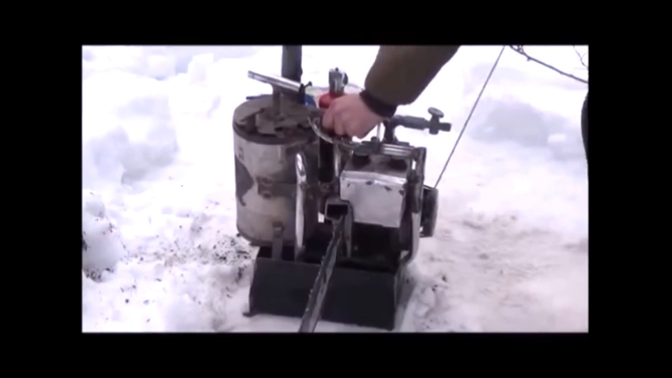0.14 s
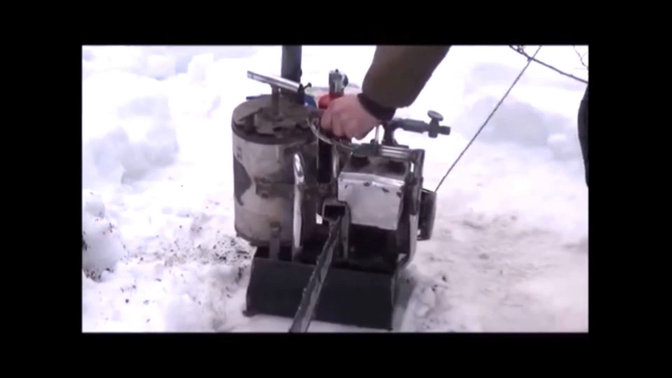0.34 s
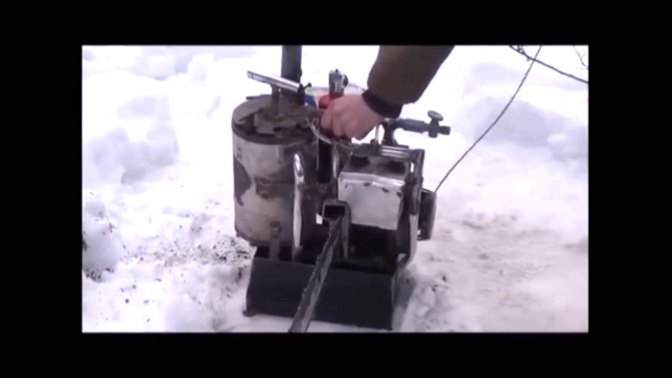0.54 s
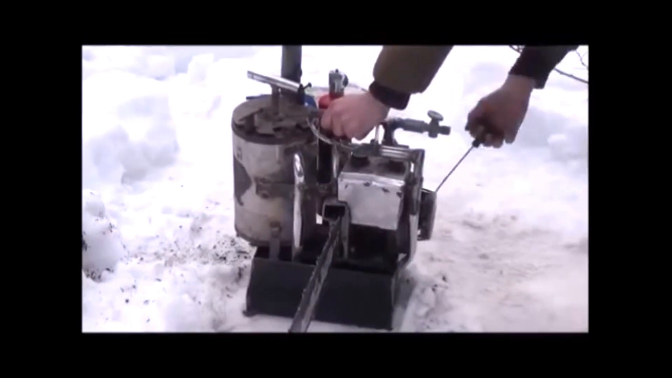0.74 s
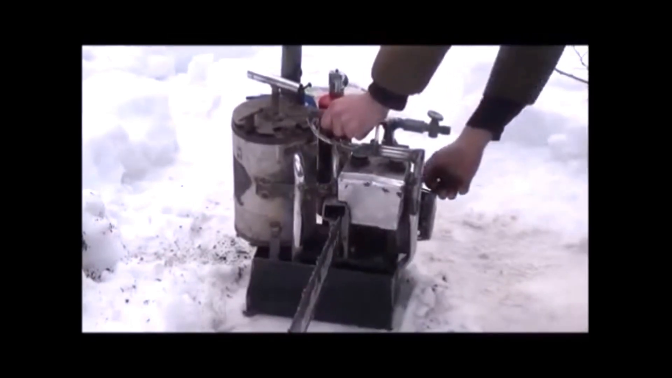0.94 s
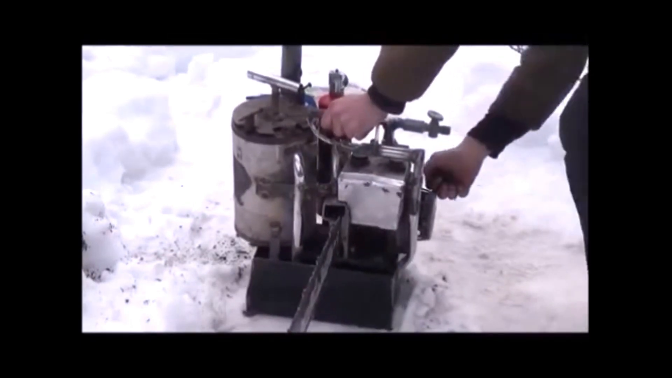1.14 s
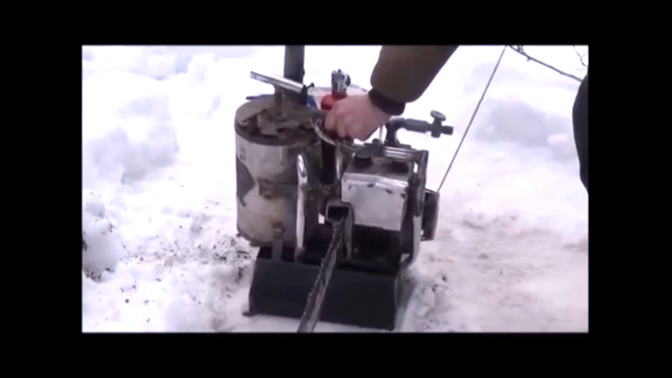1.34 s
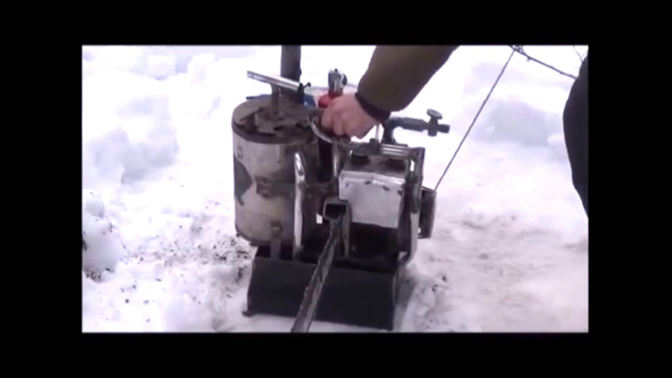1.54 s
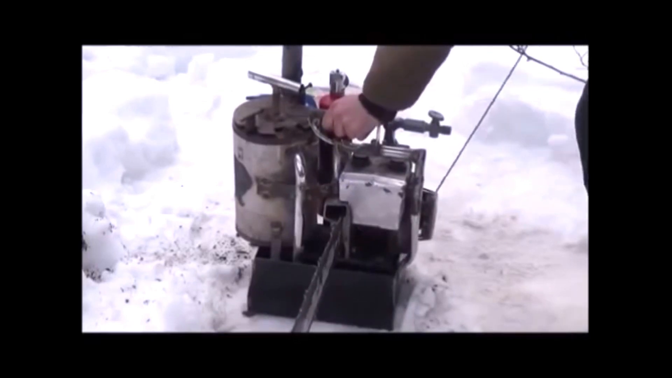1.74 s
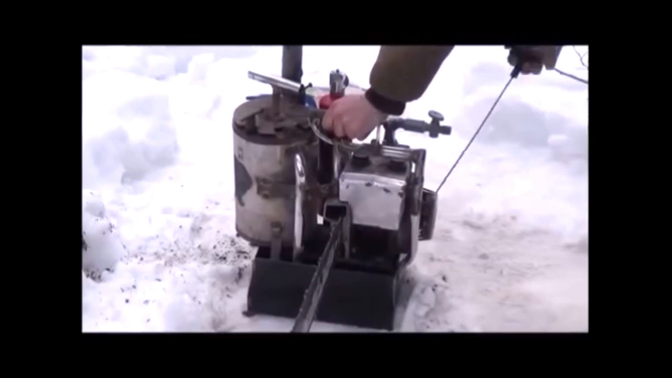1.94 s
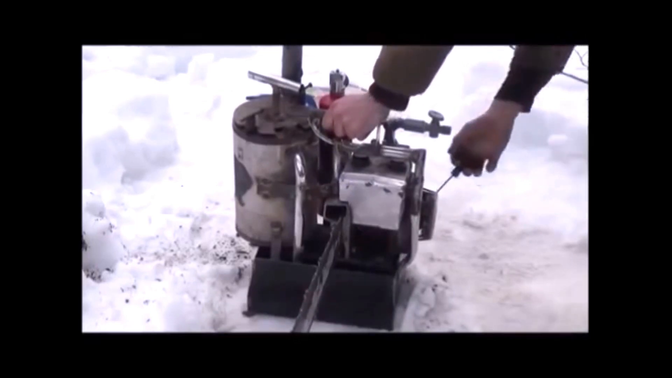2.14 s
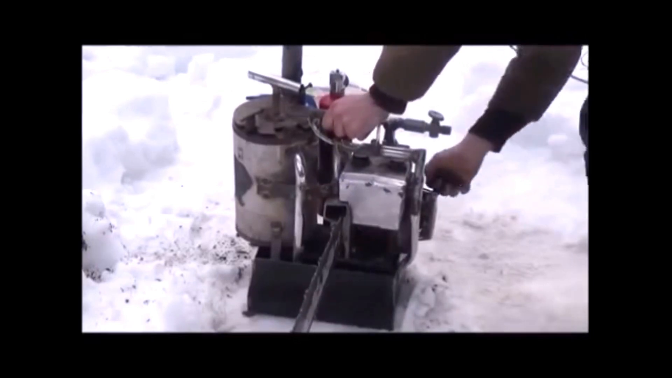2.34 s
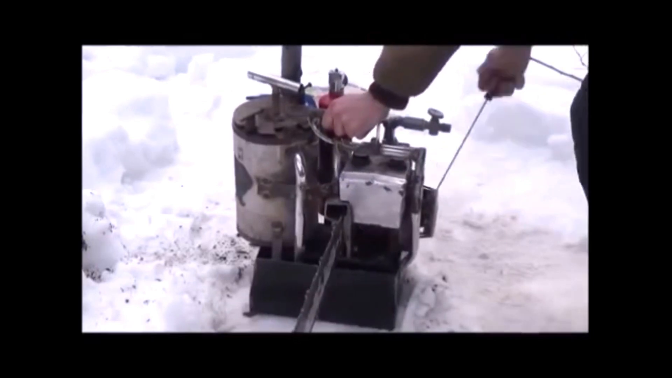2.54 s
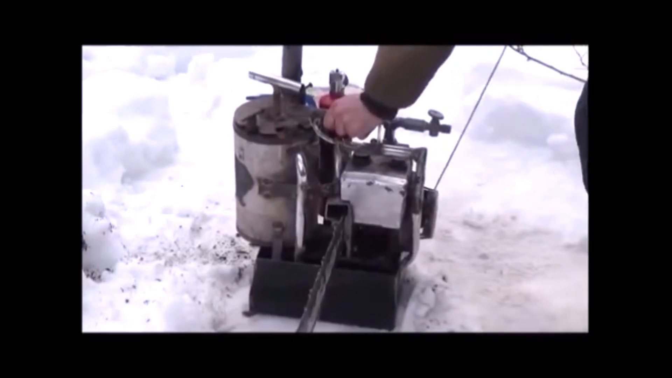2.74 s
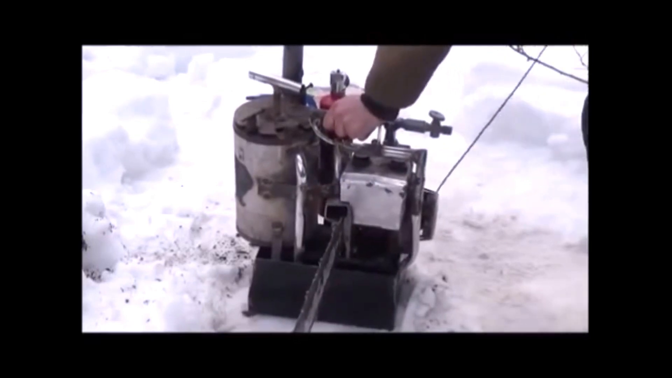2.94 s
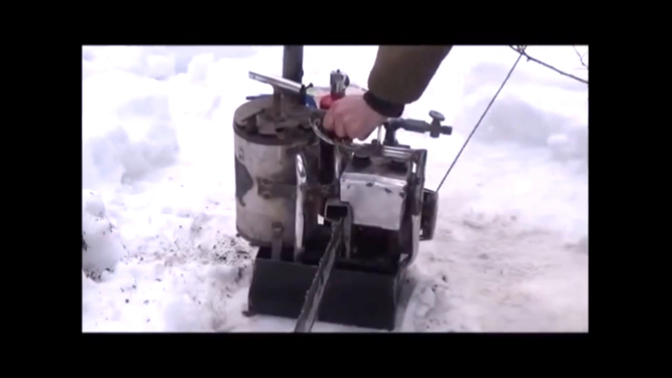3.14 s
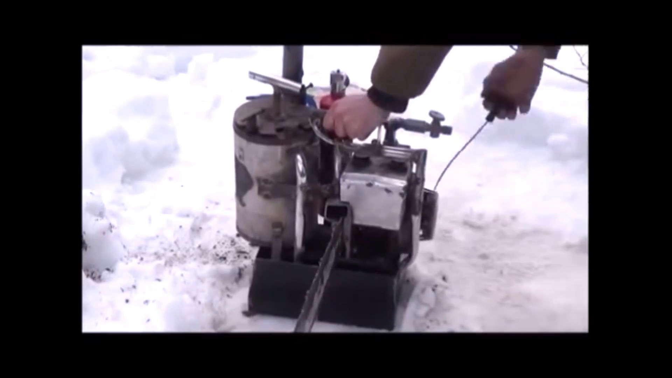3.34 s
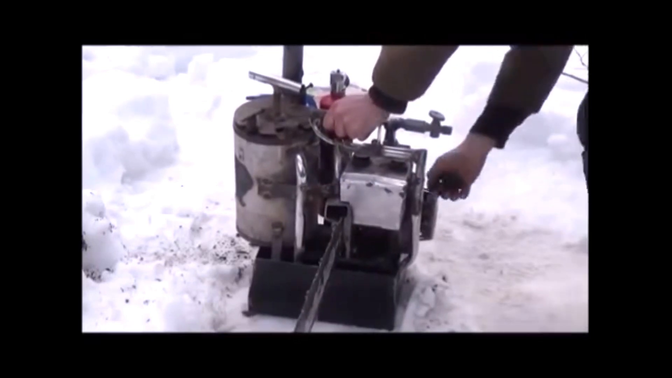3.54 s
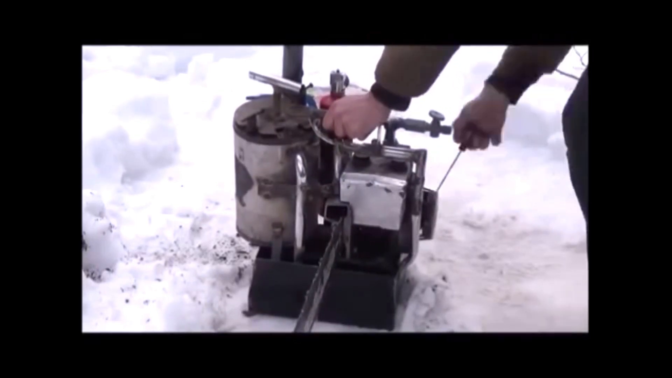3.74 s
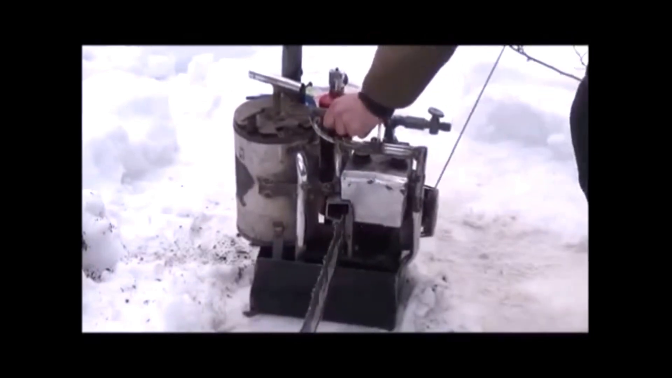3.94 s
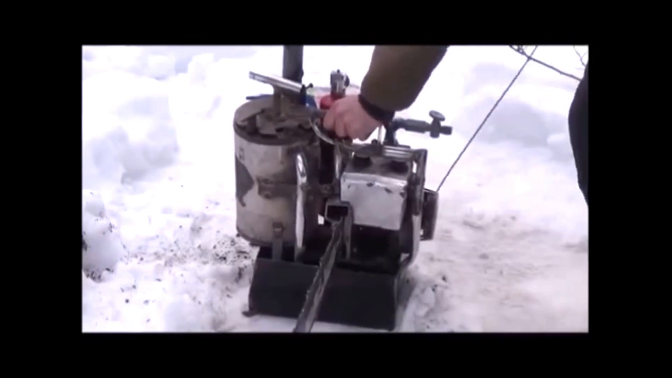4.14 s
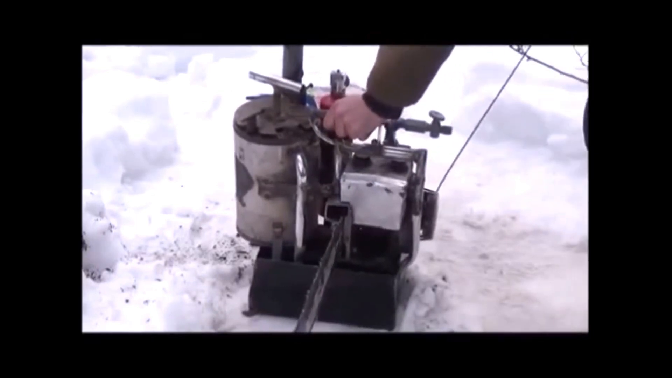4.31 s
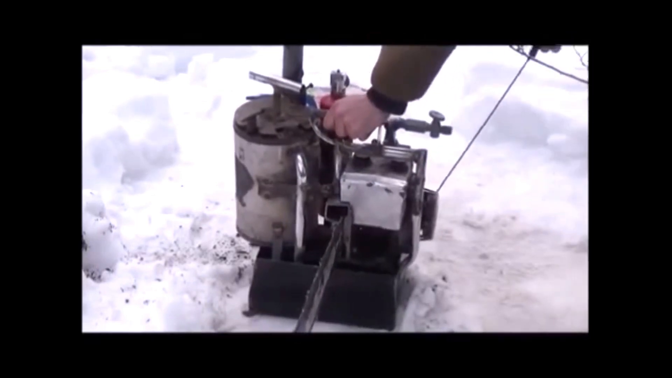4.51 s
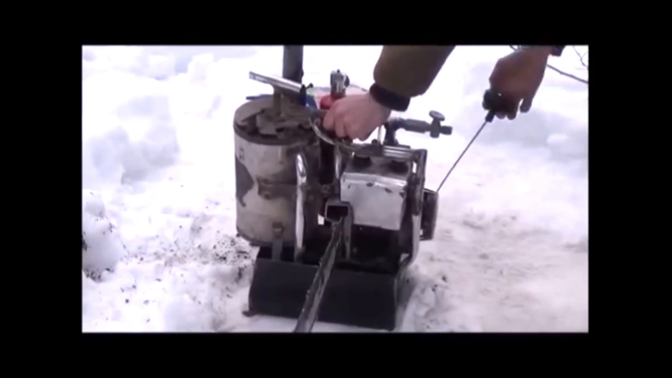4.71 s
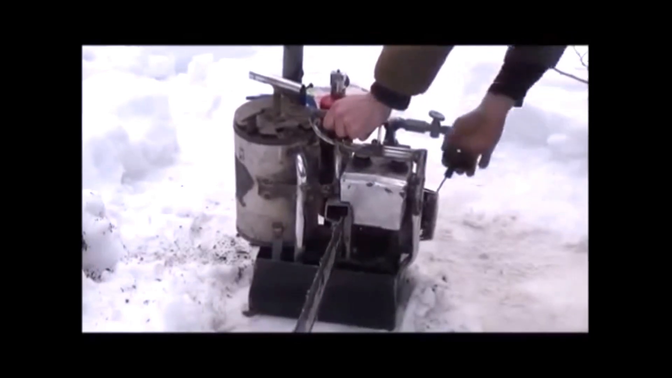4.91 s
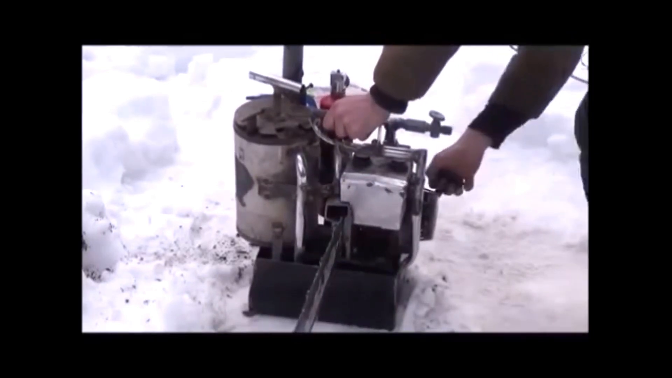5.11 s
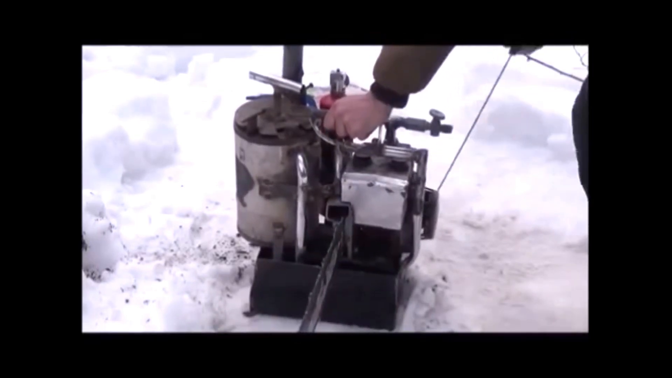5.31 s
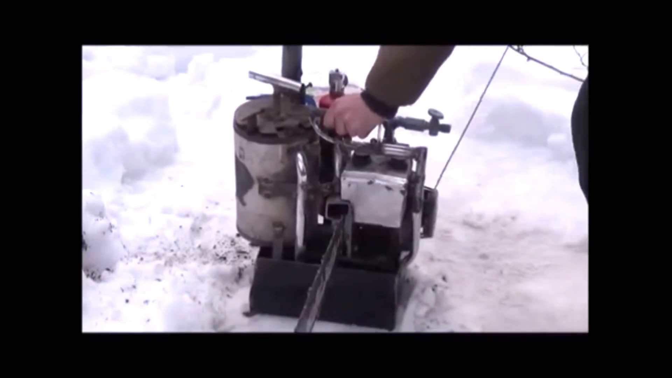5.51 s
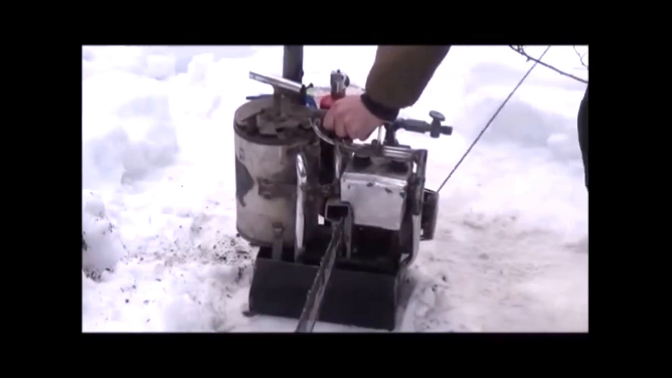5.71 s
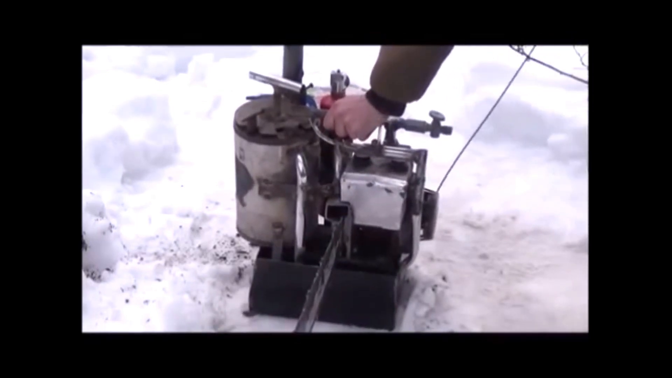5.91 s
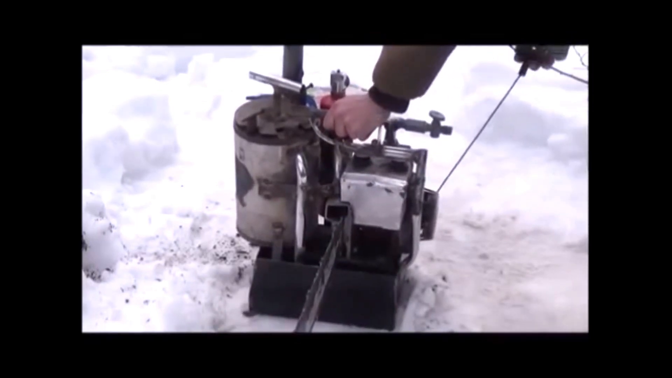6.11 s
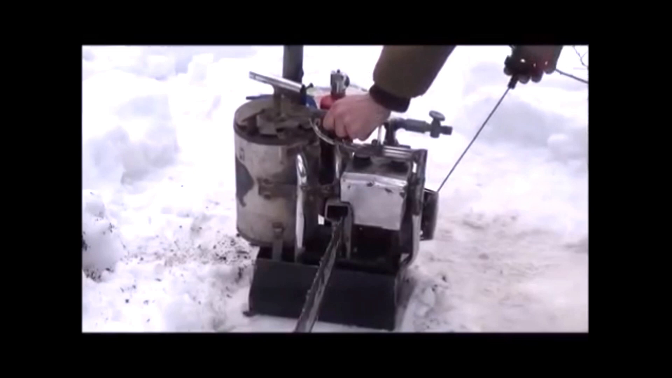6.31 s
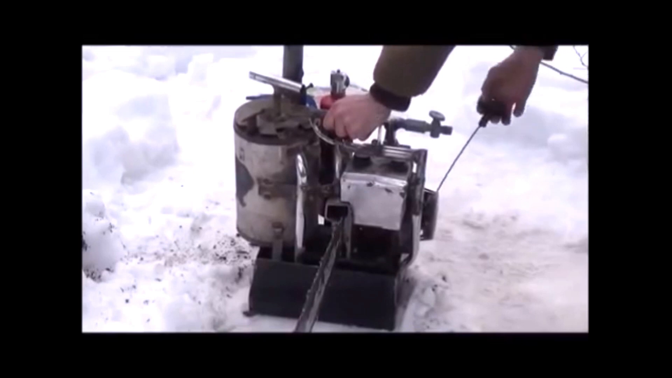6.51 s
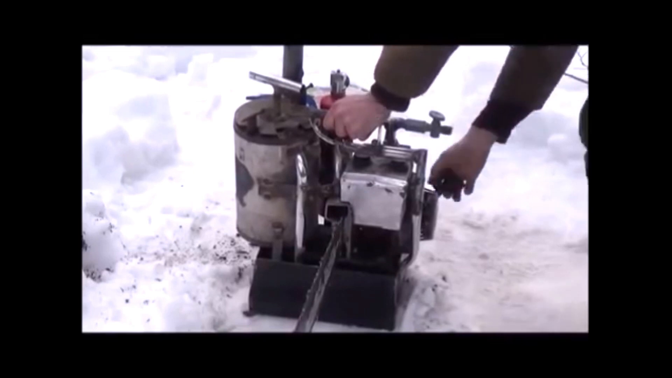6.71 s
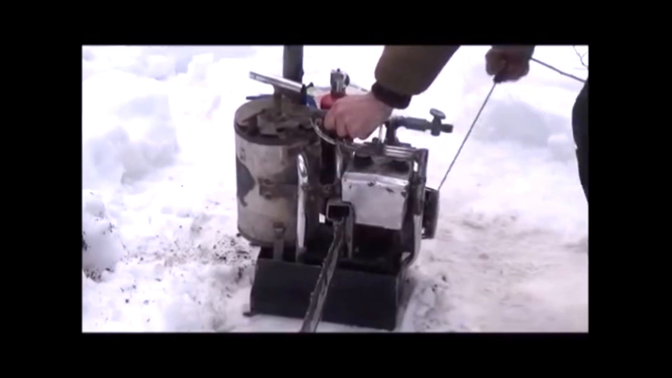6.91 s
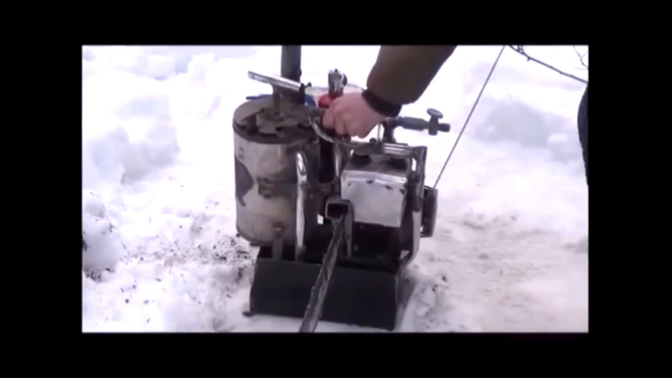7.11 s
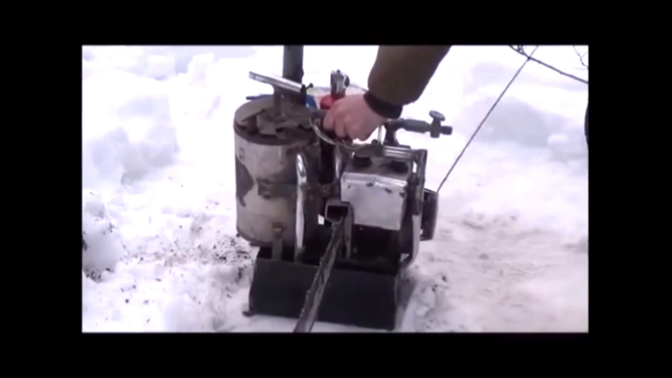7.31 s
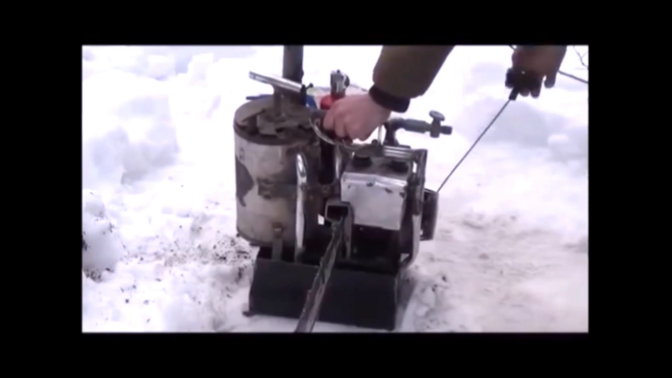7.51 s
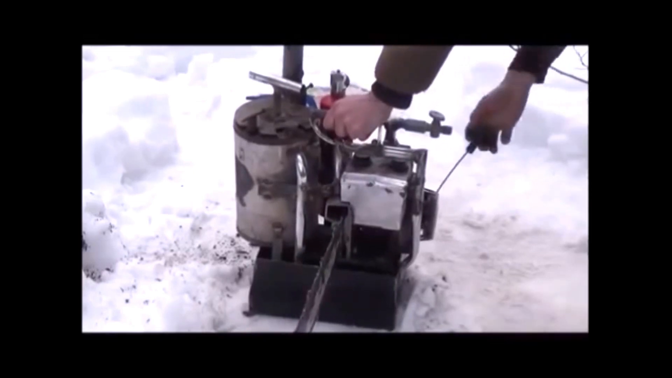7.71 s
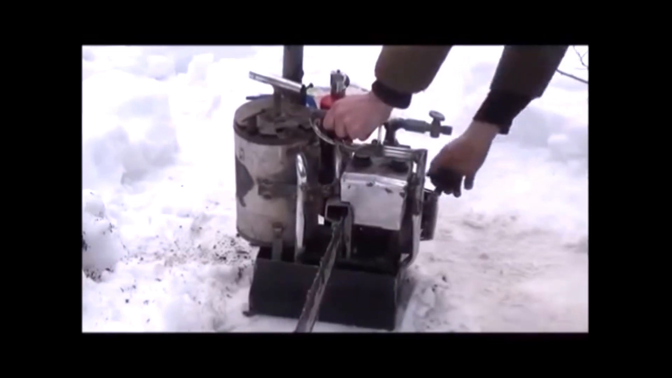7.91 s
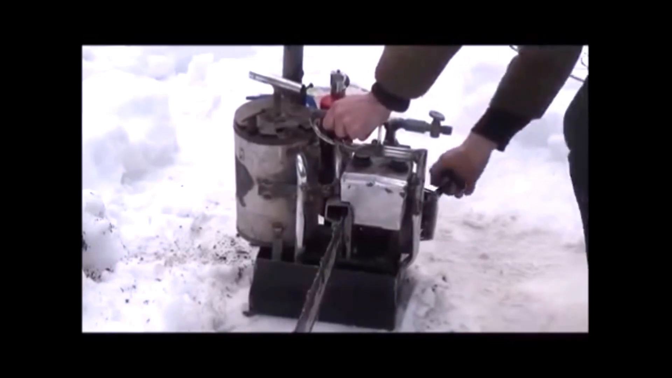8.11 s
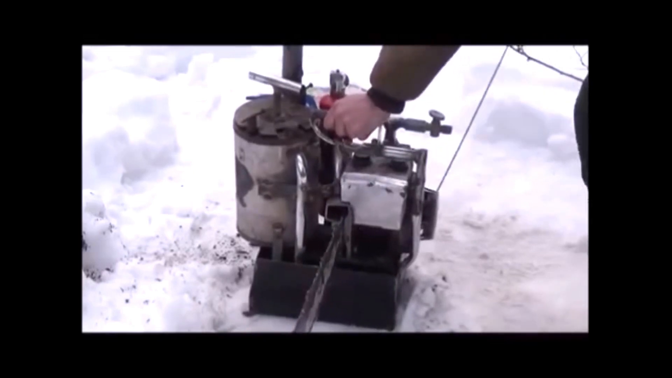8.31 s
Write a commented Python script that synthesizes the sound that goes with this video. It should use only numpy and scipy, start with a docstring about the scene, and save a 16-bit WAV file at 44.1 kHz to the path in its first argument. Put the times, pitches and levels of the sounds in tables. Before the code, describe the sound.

Repeated failed starts of a little engine, heard close and dry outdoors. The cord bites with a metallic clack, the crank whirrs and knocks, and the muffler throws out a short stutter of blunt pops. Turns spread apart, loose steel rattles and the thin tank pings faintly, then near silence until the next yank, a little over a second after the last. Six attempts in all.

```python
"""In a snowy winter yard, two close microphone ports hear a small two-stroke engine pulled over by its cord.
Each of six pulls cranks it, catches in brief kicks and then coasts down, over quiet air and a short yard return.
Each turn puffs through the muffler while the crank knocks and loose steel clanks, all as damped rings and
noise bursts; the starter pawls squeal on their cup, the tank pings, and whirr and pumping follow the speed."""
import sys
import numpy as np
from scipy import signal
from scipy.fft import rfft, irfft, next_fast_len
from scipy.io import wavfile
from scipy.ndimage import map_coordinates

SR = 44100
rng = np.random.default_rng(int(sys.argv[2]) if len(sys.argv) > 2 else 0)


def persist_wave(psi):
    """Save psi, clipped to +-1, as 16-bit WAV."""
    counts = np.round(np.clip(psi, -1, 1) * 32767).astype(np.int16)
    wavfile.write(sys.argv[1], SR, np.atleast_2d(counts).T)


N = 368235


def amp(db):
    """dB to gain."""
    return 10 ** (np.asarray(db) / 20)


def unit(x):
    """Scale to rms 1."""
    return x / np.sqrt(np.mean(x ** 2) + 1e-20)


def along(points, hz):
    """Read (Hz, value) points at hz, on a log frequency axis."""
    f, v = np.transpose(points)
    return np.interp(np.log(hz + 1), np.log(f + 1), v)


def curves(rows):
    """One dB value per sample for each column after the time; silent outside."""
    s, *columns = np.transpose(rows)
    return [np.interp(np.arange(N) / SR, s, column, -120, -120) for column in columns]


def wobble(rate):
    """A smooth random curve, rate knots a second."""
    knots = rng.standard_normal(int(N * rate / SR) + 4)
    return map_coordinates(knots, [np.arange(N) * rate / SR])


def filtered(x, response):
    """x times a complex response of frequency."""
    m = next_fast_len(N + SR // 2)
    spectrum = rfft(x, m) * response(np.fft.rfftfreq(m, 1 / SR))
    return irfft(spectrum, m)[..., :N]


def resonant(modes):
    """Causal response of (Hz, width Hz, dB) resonances."""
    return lambda f: sum(amp(db) * 1j * f * w / (c * c - f * f + 1j * f * w) for c, w, db in modes)


def noise(response, shape=N):
    """Coloured noise of rms 1."""
    return unit(filtered(rng.standard_normal(shape), response))


def placed(times, sounds):
    """Sum the rows of sounds at their times."""
    at = np.round(times * SR).astype(int)[:, None] + np.arange(sounds.shape[1])
    return np.bincount(at.ravel(), sounds.ravel(), N + SR)[:N]


# Colour of the quiet air: pitch_hz, relative level_db.
AIR_COLOUR = [(15, -55.5), (25, -11), (193, -12.5), (322, -8), (567, -10), (631, -3.5), (703, -16),
              (3720, -24), (7500, -28.5), (14300, -28.5), (15500, -31)]
AIR_DB = -68.5  # before the mix of shared and own air


def air():
    """Quiet winter air, partly shared by both microphones."""
    colour = lambda f: amp(along(AIR_COLOUR, f))
    shared, own = noise(colour), noise(colour, (2, N))
    return amp(AIR_DB + 1.3 * wobble(18)) * (1.2 * shared + .55 * own)


# Per pull, runs of slowing turns, each filling the time to the next row:
# start_s, turns (count), slowing (added length per turn, share of the first), first_puff_db.
PULL_TURNS = [
    [(.2247, 1, 0, -20), (.2672, 6, .1, -19.5), (.513, 2, -.05, -20.5), (.6437, 4, .26, -18.5),
     (.9808, 0, 0, -37)],
    [(1.491, 1, 0, -16), (1.534, 6, .12, -24), (1.7576, 2, .28, -15.5), (1.8673, 4, .28, -18.5),
     (2.0801, 3, .39, -20.5), (2.312, 1, 0, -28.5), (2.4065, 0, 0, -44.5)],
    [(2.7904, 1, 0, -21), (2.8322, 5, .17, -19.5), (3.0458, 4, .3, -16.5), (3.2727, 2, .32, -19),
     (3.4568, 0, 0, -34.5)],
    [(4.0536, 1, 0, -13.5), (4.0958, 6, .16, -22), (4.3237, 4, .27, -22), (4.5057, 4, .28, -19),
     (4.7098, 5, .43, -19), (5.0667, 0, 0, -32.5)],
    [(5.578, 1, 0, -19.5), (5.6172, 5, .09, -23.4), (5.8029, 4, .14, -15.5), (5.9902, 3, .17, -18.5),
     (6.1233, 2, .26, -14.5), (6.2443, 3, .3, -20), (6.3791, 3, .13, -23), (6.6536, 0, 0, -41)],
    [(7.173, 1, 0, -14.6), (7.2193, 4, .22, -18), (7.3934, 2, .37, -16.5), (7.5079, 3, .55, -19),
     (7.6831, 2, .08, -21), (7.8784, 0, 0, -39)],
]
# Later puffs weaken once the turn before outlasts BRISK_S.
PUFF_DB, PUFF_SAG_DB_PER_S, BRISK_S = -20, 211, 0.054


def turns():
    """Every turn: start s, length s (0 for the last of a pull), puff dB and whether it is later in a run."""
    rows = []
    for pull in PULL_TURNS:
        before = 0
        for (s, count, slowing, first_db), (end, *_) in zip(pull, pull[1:] + pull[-1:]):
            lengths = 1 + slowing * np.arange(max(round(count), 1))
            lengths = lengths * (end - s) / lengths.sum()
            for k, length in enumerate(lengths):
                later_db = PUFF_DB - PUFF_SAG_DB_PER_S * max(before - BRISK_S, 0)
                rows.append((s + lengths[:k].sum(), length, later_db if k else first_db, k > 0))
                before = length
    return np.transpose(rows)


# Crank speed around a grab: after_s, speed (turns a second).
CRANKING_SPEED = [(-.03, 1.9), (.008, 10.9)]
# Crank speed after the last puff of a pull: after_s, speed (turns a second).
COASTING_SPEED = [(.06, 4.75), (.22, 2), (0.398, 1.4)]
# Whirr added by the hauled cord and pulley: after_grab_s, gain_db.
CORD_WHIRR = [(.05, 0), (.11, 3), (.22, 0.5), (.33, 0)]
# Base levels at 20 turns a second; gain per doubling of speed.
WHIRR_DB, WHIRR_GROWS_DB, PUMP_DB, PUMP_GROWS_DB = -34, 9, -46, 9
WHIRR_FULL = 0.11  # doublings of speed past which the whirr grows no more
# Compression brakes the crank late in a turn: dip per doubling of turn length.
SQUEEZE_DB, SQUEEZE_FROM_S, SQUEEZE_LATE = 5, 0.026, 1.56


def spin_db():
    """Whirr and pumping levels follow the crank speed and dip in each compression."""
    s, length = turns()[:2]
    knots = [(a + b / 2, 1 / b) for a, b in zip(s, length) if b > 0]
    knots += [(grab + after, speed) for grab, _ in HOUSING_GRABS for after, speed in CRANKING_SPEED]
    knots += [(pull[-1][0] + after, speed) for pull in PULL_TURNS for after, speed in COASTING_SPEED]
    at, speed = np.transpose(sorted(knots))
    t = np.arange(N) / SR
    doublings = np.interp(t, at, np.log2(speed / 20))
    share, turn = np.modf(np.interp(t, s, np.arange(len(s))))
    slow = np.log2(np.maximum(length[turn.astype(int)] / SQUEEZE_FROM_S, 1))
    dip_db = SQUEEZE_DB * slow * np.sin(np.pi * share ** SQUEEZE_LATE) ** 2
    cord_db = sum(np.interp(t - grab, *np.transpose(CORD_WHIRR)) for grab, _ in HOUSING_GRABS)
    whirr_db = WHIRR_DB + WHIRR_GROWS_DB * np.minimum(doublings, WHIRR_FULL) + cord_db - dip_db
    pump_db = PUMP_DB + PUMP_GROWS_DB * doublings - dip_db
    return whirr_db, pump_db


def buffet():
    """Air stirred by the engine flutters the left port more than the right."""
    flutter = noise(lambda f: f / (1 + (f / 38) ** 3), (2, N))
    port_db = np.array([[4], [-5]])
    return amp(spin_db()[1] - 20.5 + 3.1 * wobble(8.6) + port_db) * flutter


# Colour of the whirring parts, also of rattle and exhaust hiss: pitch_hz, relative level_db.
WHIRR_COLOUR = [(210, -19.5), (350, 0.5), (591, -5.5), (692, 4.5), (951, -8), (1410, -5), (1790, -8),
                (3900, -8.5), (5980, -21.5), (7240, -30), (9940, -13.5), (13000, -25), (15500, -54.5)]


def rattle(count):
    """Loose parts jiggle: many tiny damped rings at scattered times, pitches and sizes."""
    draw = rng.random((count, 4))
    hz = 900 * amp(17.83 * draw[:, 1:2])
    t = np.arange(512) / SR
    cycles = t * hz / (2 + 4 * draw[:, 2:3])  # time in units of each ring's own life
    size = amp(along(WHIRR_COLOUR, hz) - 3 * np.log(draw[:, 3:] + .01))
    rings = size * cycles * np.exp(-2 * cycles) * np.sin(2 * np.pi * hz * t)
    return unit(placed(draw[:, 0] * N / SR, rings))


# Colour of the air the piston pumps: pitch_hz, relative level_db.
PUMP_COLOUR = [(13, -52.5), (22, -26), (54, -26.5), (121, -0.5), (168, 0), (345, 1), (600, -19), (780, -46),
               (1320, -120)]


def spin():
    """Bearings, fan and piston rings whirr under the rattle; the piston pumps air."""
    whirr_db, pump_db = spin_db()
    flicker = amp(3 * wobble(120) + 2.2 * wobble(30))
    whirr = unit(flicker * noise(lambda f: amp(along(WHIRR_COLOUR, f))))
    pump = unit(amp(3 * wobble(25)) * noise(lambda f: amp(along(PUMP_COLOUR, f))))
    return amp(whirr_db) * (.5 * whirr + 0.53 * rattle(count=7000)) + amp(pump_db + 6) * pump


# Contacts in every lively turn: share (of the turn), knock_db, knock_hz, frame_db, cup_db.
TURN_CONTACTS = [(.05, -59.5, 1380, -32.5, -53.5), (.38, -25.5, 1430, -42.5, -57),
                 (.71, -35, 1341, -43, -57), (.87, -26, 1353, -40, -53)]
STROKE_SAG_DB, EVEN_S = 7.5, 0.052  # dB lost per doubling of turn length past EVEN_S
STROKE_SCATTER_DB, STROKE_JITTER, KNOCK_SPREAD_HZ = 3, 0.01927, 80  # jitter as a share of the turn
HELD_DB = -1  # negative: a turn's last contact is 1 dB weaker when a new run's puff follows


def strokes():
    """Contacts every turn but the dying one repeats, weaker when slow: s, knock dB, Hz, frame dB, cup dB."""
    s, length, _, later = turns()
    lively = (length > 0) & (np.roll(length, -1) > 0)
    kicked = 1 - np.roll(later, -1)[lively, None]
    s, length = s[lively, None], length[lively, None]
    share, knock_db, hz, frame_db, cup_db = np.transpose(TURN_CONTACTS)
    draw = rng.standard_normal((len(s), len(TURN_CONTACTS), 4))
    sag_db = STROKE_SAG_DB * np.clip(np.log2(length / EVEN_S), 0, 2)
    sag_db = sag_db - HELD_DB * kicked * (share == share.max())
    level = lambda db, k: db - sag_db + STROKE_SCATTER_DB * draw[..., k]
    times = s + length * (share + STROKE_JITTER * draw[..., 0])
    pitch_hz = hz + KNOCK_SPREAD_HZ * draw[..., 2]
    columns = times, level(knock_db, 1), pitch_hz, level(frame_db, 3), level(cup_db, 3)
    return np.reshape(columns, (5, -1)).T


def struck(modes, count, rise):
    """One ring per blow, every mode at a new strength, sign and slightly new pitch."""
    t = np.arange(round(.2 * SR)) / SR
    draw = rng.standard_normal((count, len(modes), 2))
    rings = 0
    for k, (hz, db, t60) in enumerate(modes):
        pitch = hz * (1 + .04 * draw[:, k, 1:])
        fade = draw[:, k, :1] * amp(db - 60 * t / t60)
        rings = rings + fade * np.sin(2 * np.pi * pitch * t)
    return rings * (1 - np.exp(-t / rise))


# Steel on steel: start_s, frame_db, cup_db (starter cup), both relative.
STEEL_CLANKS = [(.1351, -36.5, -20), (.1448, -43, -19), (.1488, -31.5, -16.5), (.2295, -26.5, -22.5),
                (.2772, -31.5, -8), (.3107, -28, -15.5), (.3628, -44, -16.5), (.6403, -46, -24),
                (.7752, -29, -40), (.8335, -44, -36), (.8628, -33, -41), (.8939, -42.5, -62),
                (.9258, -39.5, -49), (.9719, -32, -32), (1.0347, -36, -37), (1.1516, -35.5, -60),
                (1.193, -44.5, -78), (1.4179, -45, -15), (1.4255, -21, -10.5), (1.5341, -43.5, -8),
                (1.5401, -32, -19), (1.8018, -33, -25), (1.8629, -68, -23), (2.007, -31.5, -51),
                (2.0774, -29.5, -27), (2.2043, -30, -39), (2.293, -31.5, -38), (2.3272, -36.5, -52),
                (2.394, -54, -36), (2.4054, -32, -31), (2.4725, -41, -67), (2.616, -55, -80),
                (2.697, -41, -48), (2.7083, -38.5, -12), (2.7156, -32, -24), (2.7267, -20.5, -11),
                (2.7886, -26.5, -15.5), (2.8171, -26, -15), (2.853, -28.5, -13.5), (3.0427, -59, -26.5),
                (3.2693, -34, -23.5), (3.3448, -34, -37), (3.3587, -43, -54.5), (3.3975, -41, -60),
                (3.4385, -33, -34), (3.472, -36.5, -45), (3.5098, -38.5, -50), (3.5544, -33, -36.5),
                (3.6367, -44, -63), (3.6987, -41.5, -58), (3.7113, -46.5, -27), (3.7666, -56, -70),
                (3.9633, -50.5, -60), (3.9817, -40, -17.5), (3.99, -23, -15), (4.0601, -25.5, -16),
                (4.1032, -28.5, -10), (4.181, -54.5, -22.5), (4.2186, -35, -13), (4.238, -36.5, -19),
                (4.3189, -60, -26.5), (4.5023, -35.5, -22), (4.7097, -38, -30), (4.8667, -32, -50),
                (4.9474, -28.5, -34), (4.9646, -45, -53), (5.0547, -33, -42), (5.0913, -38, -58),
                (5.1901, -33.5, -37), (5.4906, -40, -18), (5.4985, -25, -14), (5.5836, -39.5, -15.5),
                (5.5993, -43, -16), (5.6264, -50.5, -12), (5.644, -43, -18.5), (5.801, -60, -31.5),
                (5.9858, -40.5, -25), (6.1216, -33.5, -32), (6.239, -32, -22), (6.3635, -27, -53),
                (6.4435, -60, -32.5), (6.4559, -33.3, -42), (6.5422, -34.5, -41), (6.572, -36, -60),
                (6.6015, -40.5, -60), (6.6496, -29, -33.5), (6.7076, -38, -71), (6.826, -37, -53),
                (6.887, -53, -44), (7.077, -49, -72), (7.0903, -37, -31), (7.101, -36.5, -11),
                (7.1076, -26, -17), (7.2106, -41.5, -19), (7.229, -36, -10), (7.2449, -38.5, -13.5),
                (7.28, -29, -23), (7.3267, -35, -19), (7.3898, -48, -23), (7.5018, -44, -26.5),
                (7.769, -29.5, -47), (7.7996, -55, -58), (7.8463, -68, -40), (7.8735, -31, -38),
                (7.9299, -38.5, -69), (8.0362, -36, -42), (8.1163, -60, -47)]
# Frame modes, before scatter: pitch_hz, level_db, t60_s.
FRAME_MODES = [(1720, -12, .03), (2190, -13, .03), (2510, -10, .03), (2750, -10, .03), (3170, -11, .03),
               (3530, -10, .025), (4550, -17, .025)]
# Starter cup, led by a close beating pair: pitch_hz, width_hz, level_db.
CUP_MODES = [(9600, 110, -0.5), (9790, 150, -3), (9500, 1200, -11), (11100, 7500, -27)]
# Colour of steel chatter and scrape: pitch_hz, relative level_db.
CRACK_COLOUR = [(400, -28), (900, 0), (2500, 3), (5000, -2.5), (7200, -16.5), (16000, -27.5)]


def clanks(each_turn):
    """Each contact rattles, rings the frame and ticks the starter cup."""
    s, frame_db, cup_db = np.vstack([STEEL_CLANKS, each_turn]).T
    t = np.arange(4096) / SR
    burst = (1 - np.exp(-t / .001)) * (.85 * amp(-60 * t / .03) + .15 * amp(-60 * t / .08))
    gate = placed(s, amp(frame_db)[:, None] * burst)
    tick_shape = amp(-60 * t / 0.011) * (1 - np.exp(-t / 0.0012))
    tick = placed(s, amp(cup_db + 18.0)[:, None] * tick_shape) * rng.standard_normal(N)
    ring = placed(s, amp(frame_db + 7.5)[:, None] * struck(FRAME_MODES, count=len(s), rise=0.0011))
    chatter = unit(amp(1.1 * wobble(500)) * noise(lambda f: amp(along(CRACK_COLOUR, f))))
    return ring + gate * chatter + filtered(tick, resonant(CUP_MODES))


# Pawls catch the flywheel: start_s, relative level_db.
HOUSING_GRABS = [(0.153, -31), (1.423, -27.5), (2.729, -25.5), (3.988, -29), (5.504, -27), (7.108, -30.5)]
# Starter housing resonances: pitch_hz, width_hz, level_db, t60_s.
HOUSING_MODES = [(810, 610, -1, 0.13), (513, 330, -5.5, 0.21)]


def grabs():
    """The housing clunks as the cord bites; its low resonances last longest, so the colour sinks."""
    s, db = np.transpose(HOUSING_GRABS)
    t = np.arange(SR // 4) / SR
    clunk = 0
    for hz, wide, level, t60 in HOUSING_MODES:
        fade = amp(db[:, None] + 2.0 + level - 60 * t / t60)
        shake = placed(s, fade * (1 - np.exp(-t / (t60 / 20))))
        clunk = clunk + shake * noise(resonant([(hz, wide, 0)]))
    return clunk


# Hard knocks and the last rocking: time_s, relative level_db, pitch_hz (before its slide).
CRANK_KNOCKS = [(.1934, -28.5, 1290), (.2118, -20, 1360), (.2184, -21.5, 1343), (.263, -17, 1240),
                (.4609, -18.5, 1280), (.4819, -21, 1404), (.6395, -17, 1219), (.8617, -30.5, 1270),
                (.8927, -40, 1404), (.9265, -34, 1500), (.9724, -36.5, 1330), (1.0306, -35.5, 1485),
                (1.0901, -40.5, 1543), (1.1494, -36, 1335), (1.1911, -41, 1170), (1.4265, -26.5, 1596),
                (1.4911, -22.5, 1210), (1.5312, -18.5, 1193), (1.7, -20.5, 1456), (1.7521, -19, 1310),
                (1.7755, -27, 1415), (1.8628, -15.5, 1430), (1.8789, -23.5, 1534), (1.9021, -23, 1265),
                (2.0762, -16.5, 1300), (2.2103, -29, 1462), (2.3262, -37, 1420), (2.3625, -36.5, 1340),
                (2.4082, -31, 1484), (2.4767, -36, 1430), (2.7173, -28, 1610), (2.7747, -23, 1360),
                (2.816, -19, 1120), (3.0404, -20.5, 1340), (3.2669, -19, 1330), (3.3959, -34.5, 1420),
                (3.4293, -31.5, 1310), (3.4397, -28.5, 1480), (3.4717, -39.5, 1450), (3.508, -37.5, 1440),
                (3.5604, -39, 1340), (3.6345, -38.5, 1430), (3.7155, -42, 1040), (3.9968, -29.5, 1120),
                (4.0531, -23.5, 1270), (4.0913, -19.5, 1140), (4.3172, -17, 1300), (4.3316, -19.5, 1570),
                (4.5, -18, 1414), (4.5325, -20.5, 1170), (4.7044, -18.5, 1369), (4.953, -35, 1444),
                (4.9842, -43, 1470), (5.0387, -34, 1250), (5.05, -25.5, 1463), (5.0924, -38, 1480),
                (5.1881, -42, 1480), (5.5058, -21, 1150), (5.573, -22, 1410), (5.607, -21.5, 1370),
                (5.6153, -17.5, 1170), (5.7962, -19, 1400), (5.8806, -18, 1297), (5.9831, -17, 1440),
                (6.014, -23.5, 1160), (6.1194, -16.5, 1264), (6.2352, -18.5, 1450), (6.4526, -25, 1380),
                (6.5726, -46, 1440), (6.6058, -41.5, 1350), (6.6495, -34.5, 1400), (6.8311, -39.5, 1305),
                (7.1661, -28, 1190), (7.2142, -21.5, 1223), (7.3881, -17, 1270), (7.5015, -16, 1371),
                (7.5335, -21.5, 1160), (7.6806, -21.5, 1380), (7.7653, -28, 1420), (7.8003, -38.5, 1570),
                (7.872, -33.5, 1420), (7.925, -34.5, 1380), (8.0369, -41, 1400)]


def crankcase(each_turn):
    """Knocks are a few cycles long, longer when hard, at their own sliding pitch with a rough edge."""
    s, db, hz = np.vstack([CRANK_KNOCKS, each_turn]).T[:, :, None]
    t = np.arange(1024) / SR
    draw = rng.random((len(s), 4))
    life = .0013 * (.8 + .4 * draw[:, :1]) * amp(np.clip(.2 * (db + 25), -2, 2))
    swell = amp(db + 0.4) * t / life * np.exp(1 - t / life)
    cycles = hz * t * (1 + 15 * (draw[:, 3:] - .7) * (t - 2 * life))
    low_gain = 0.47 * amp(np.clip(0.58 * (db + 22), -3, 3))  # hard knocks carry more of the lower tone
    low_tone = np.sin(2 * np.pi * (0.575 * cycles + draw[:, 2:3]))
    tone = np.sin(2 * np.pi * (cycles + draw[:, 1:2])) + low_gain * low_tone
    at = s[:, 0] - .001
    rough = 0.18 * placed(at, swell) * noise(resonant([(1840, 580, 0)]))
    return placed(at, swell * tone) + rough


PUFF_SCATTER_DB = 0.84


def puffs():
    """(s, dB) of each port opening; only the later puffs of a run scatter."""
    s, _, db, later = turns()
    return s, db + later * PUFF_SCATTER_DB * rng.standard_normal(len(s))


# Muffler resonances, before scatter: pitch_hz, decay_s, level_db.
MUFFLER_MODES = [(185, .0075, -6.5), (430, .003, -10)]


def exhaust():
    """Each port opening is one pressure push, blunter when weak, that rings the muffler and hisses."""
    s, db = np.array(puffs())[:, :, None]
    t = np.arange(-256, 2816) / SR
    draw = rng.standard_normal((len(s), len(MUFFLER_MODES), 2))
    wide = 0.00042 * amp(np.clip(-.3 * (db + 9), -3, 7))
    push = np.exp(-.5 * (t / wide) ** 2)
    # Each puff rings at a slightly scattered pitch and strength.
    for k, (hz, life, level_db) in enumerate(MUFFLER_MODES):
        cycles = hz * (1 + .1 * draw[:, k, :1]) * t
        fade = np.exp(-np.abs(t) / life) / (1 + np.exp(-t / wide))
        push = push + amp(level_db + 3.8 * draw[:, k, 1:]) * fade * np.cos(2 * np.pi * cycles)
    at = s[:, 0] + t[0]
    thump = filtered(placed(at, amp(db + 2.23) * push), lambda f: (1j * f / (1j * f + 84)) ** 3)
    gate = placed(at, amp(db - 23.5) * np.exp(-np.abs(t) / np.where(t < 0, .003, .006)))
    hiss = noise(lambda f: amp(along(WHIRR_COLOUR, f) + 9 * np.log2(f / 1000 + .01)))
    return thump + gate * hiss


# Lurch gain at the left and right port, felt mostly at the left: gain_db.
LURCH_GAIN_DB = [
    [-0.5],
    [-7.5],
]
LURCH_DB, LURCH_HZ, LURCH_S = -24, 38, .016  # level over its puff, before the port gain


def lurch():
    """The whole engine lurches on its base at each pull's first compression: a deep thud."""
    s, db = np.transpose([(pull[0][0], pull[0][3]) for pull in PULL_TURNS])
    t = np.arange(SR // 5) / SR
    thud = t / LURCH_S * np.exp(1 - t / LURCH_S) * np.sin(2 * np.pi * LURCH_HZ * t)
    return placed(s, amp(db + LURCH_DB)[:, None] * thud)


SKID_RISE_S, SKID_FALL_S = 0.033, .04
SQUEAL_EDGE_DB, SCRAPE_EDGE_DB = -22, -15.5  # at both ends of a skid, relative to its hold


def skid(s, hold, squeal_db, scrape_db):
    """Rise, hold and fall of one skid as curve rows."""
    edge = squeal_db + SQUEAL_EDGE_DB, scrape_db + SCRAPE_EDGE_DB
    held = squeal_db, scrape_db
    return [(s - SKID_RISE_S, *edge), (s, *held), (s + hold, *held), (s + hold + SKID_FALL_S, *edge)]


# Pawls skid: hold_start_s, hold_s, squeal_db, scrape_db (both relative).
PAWL_SKIDS = [(.274, 0.071, -26, -36.5), (1.544, 0.044, -23.5, -30), (2.854, 0.083, -25.5, -36),
              (4.109, 0.051, -25, -30), (5.623, 0.039, -27.5, -34), (7.224, 0.022, -27.5, -37),
              (7.298, 0.022, -24, -35.5)]


def pawls():
    """Skidding pawls chatter: uneven slips excite the cup and scrape broadly."""
    squeal, scrape = (sum(amp(curves(skid(*row))[k]) for row in PAWL_SKIDS) for k in range(2))
    slips = unit(amp(3.6 * wobble(130)))
    scrape_colour = lambda f: amp(along(CRACK_COLOUR, f) + 8.5 * np.log2(f / 3000 + .01))
    grind = unit(amp(4.9 * wobble(700)) * noise(scrape_colour))
    cup = noise(lambda f: resonant(CUP_MODES[:2])(f) * resonant([(9690, 900, 0)])(f))
    return slips * squeal * cup + amp(0.5) * scrape * grind


# Jolts ring the tank: start_s, relative level_db.
TANK_PINGS = [(0.778, -34.5), (0.866, -41.5), (0.978, -41.5), (1.152, -43), (2.21, -34.5), (2.299, -40.5),
              (2.413, -34), (3.347, -39), (3.442, -43), (3.558, -48), (4.871, -38), (4.955, -34.5),
              (5.055, -38), (5.192, -45), (6.456, -36.5), (6.546, -38), (6.653, -36), (6.826, -42.5),
              (7.6, -34), (7.68, -36), (7.771, -40), (7.877, -36), (8.039, -50)]
# Tank modes: pitch_hz, level_db (before scatter), t60_s.
TANK_MODES = [(812, -2, .14), (847, 0, .2), (480, -14, .2)]


def tank():
    """The thin tank pings after a jolt; its close pair of modes beats."""
    s, db = np.transpose(TANK_PINGS)
    t = np.arange(SR // 4) / SR
    rings = 0
    for hz, level, t60 in TANK_MODES:
        fade = amp(level + rng.normal(0, 2, (len(s), 1)) - 60 * t / t60)
        rings = rings + fade * np.sin(2 * np.pi * hz * t)
    return placed(s, amp(db - 3.0)[:, None] * rings * (1 - np.exp(-t / 0.00048)))


# Return from the yard: pitch_hz, t60_s, relative level_db.
YARD_RETURN = [(150, 0.13, 0), (500, 0.2, -1), (1500, 0.03, 6), (6000, 0.028, 12), (9900, 0.28, -4.5),
               (13000, 0.017, 3)]


def yard(x):
    """Snow, frame and nearby walls return a short tail, different at each microphone."""
    hz, t, z = signal.stft(rng.standard_normal((2, SR // 4)), SR, nperseg=256)
    at, t60, level_db = np.transpose(YARD_RETURN)
    start_db = along((*zip(at, level_db),), hz)[:, None]
    fade_db = start_db - 60 * t / along((*zip(at, t60),), hz)[:, None]
    tail = signal.istft(z * amp(fade_db), SR, nperseg=256)[1]
    delayed = np.pad(x, (120, 0))[None]  # samples
    return signal.fftconvolve(delayed, tail / np.linalg.norm(tail[0]), axes=1)[:, :N]


# Phase between the ports: pitch_hz, left_lead (radians).
PORT_LEAD = [(60, -.74), (250, -.94), (500, -.93), (1000, -.32), (2000, -.14), (4000, .03)]
# Level between the ports: pitch_hz, left_minus_right_db.
PORT_TILT = [(80, 0.5), (250, -2), (600, -3.5), (1500, -2), (5000, -.5)]


def scene():
    """The engine reaches two close microphone ports with a small lead and tilt."""
    each = strokes()
    engine = spin() + clanks(each[:, [0, 3, 4]]) + grabs() + crankcase(each[:, :3])
    engine = engine + exhaust() + pawls() + tank()
    side = np.array([[.5], [-.5]])  # left, right
    port = lambda f: amp(side * along(PORT_TILT, f)) * np.exp(1j * side * along(PORT_LEAD, f))
    ports = filtered(engine, port)
    return ports + amp(-11.5) * yard(engine) + amp(LURCH_GAIN_DB) * lurch() + buffet() + air()


TOP_HZ = 16400


def record(dry):
    """Peaks are squeezed softly; treble thins out near the band limit, and nothing passes above it."""
    squeezed = dry / (1 + np.abs(dry / .33) ** 4) ** (1 / 4)
    return filtered(squeezed, lambda f: amp(-26 * np.clip((f - 14600) / 800, 0, 2)) * (f < TOP_HZ))


dry = scene()
out = record(dry)
persist_wave(out)
```